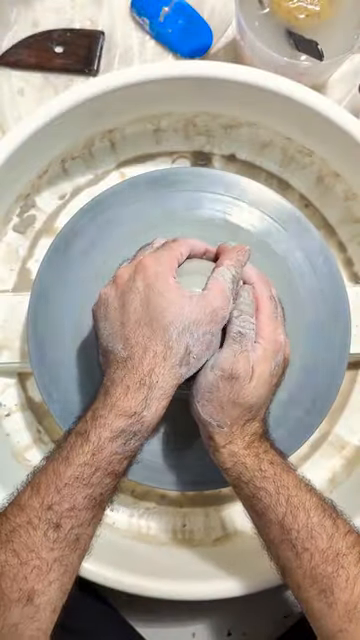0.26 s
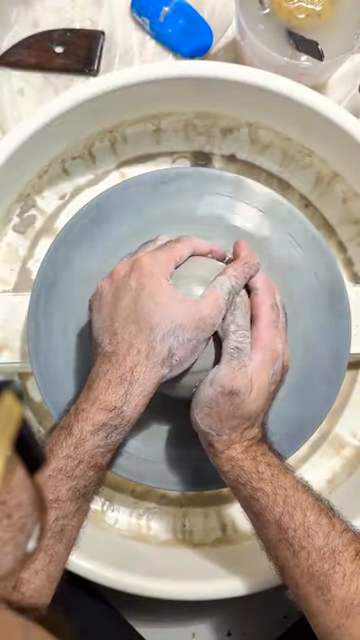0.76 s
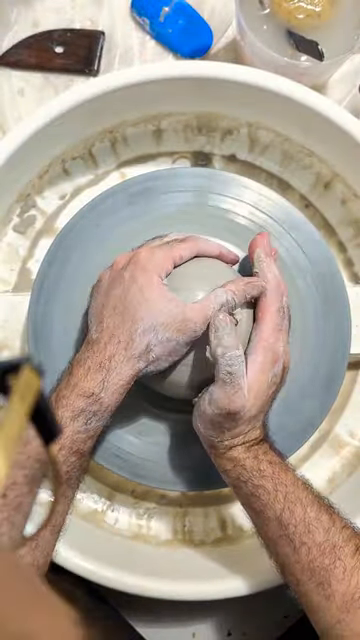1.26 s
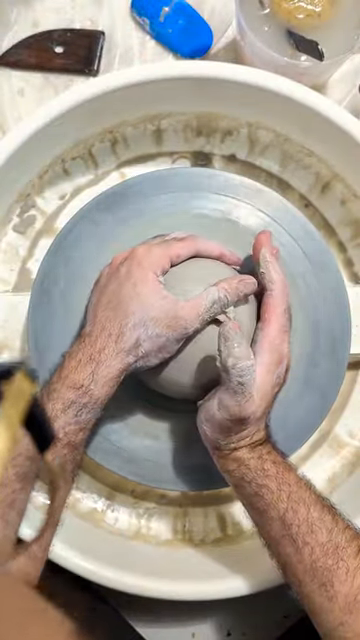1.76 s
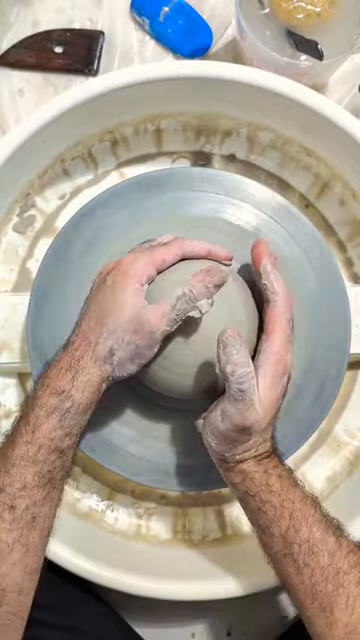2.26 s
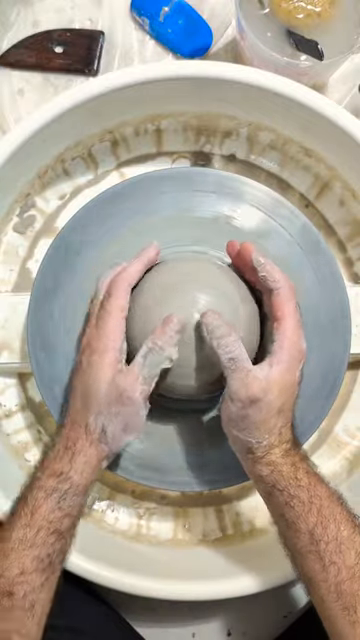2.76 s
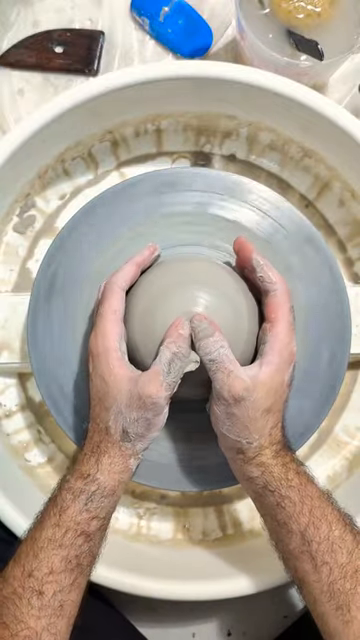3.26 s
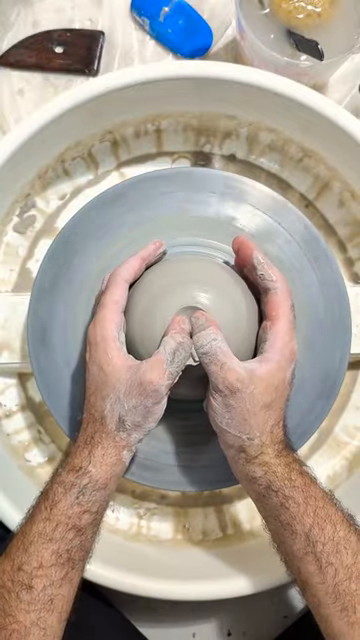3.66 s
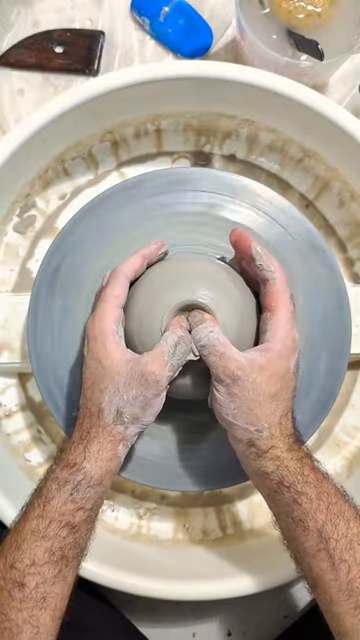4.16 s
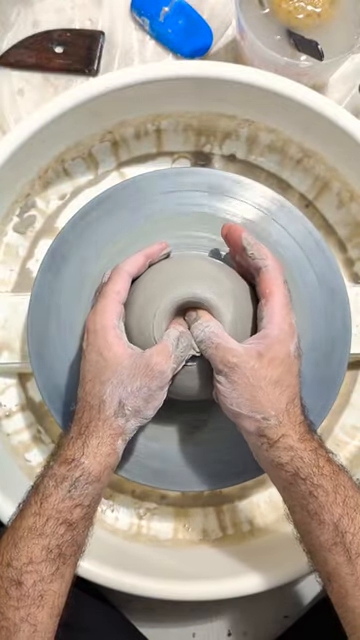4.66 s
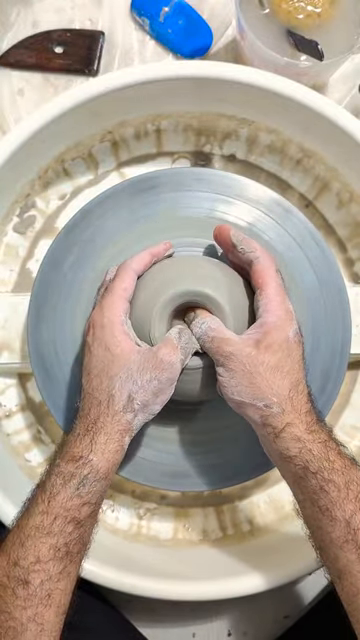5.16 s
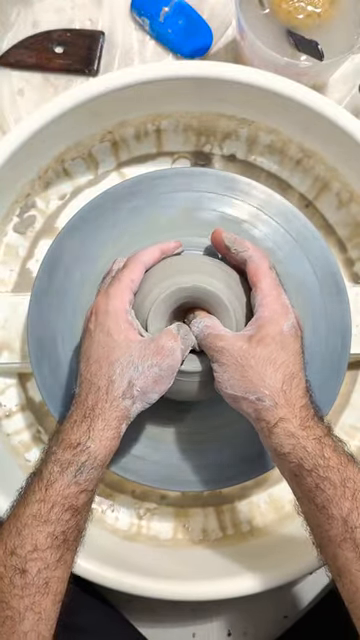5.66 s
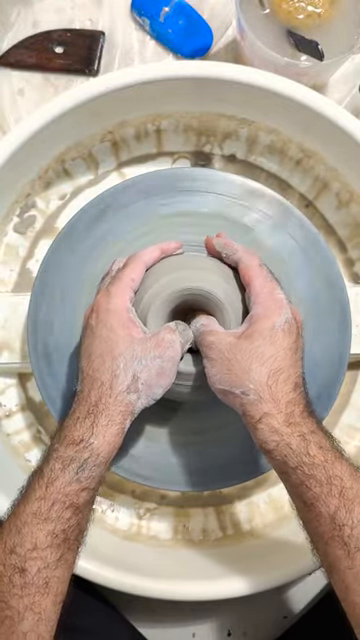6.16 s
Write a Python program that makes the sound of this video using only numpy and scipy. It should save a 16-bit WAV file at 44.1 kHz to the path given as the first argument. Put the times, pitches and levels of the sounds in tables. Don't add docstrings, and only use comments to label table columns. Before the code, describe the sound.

In a small quiet studio, a soft wet smack of clay comes over low rumble, then a pottery wheel's motor quickly spins up to a nearly pure mid-pitched whine. It sags slightly under load while wet palms rub with gritty hiss and a faint metallic ring. Dull belt grinding, fine rattling and small ticks follow, with one tiny high squeak. Close microphone, mono.

```python
import sys
import numpy as np
from scipy import signal
from scipy.fft import rfft, irfft, next_fast_len
from scipy.io import wavfile
from scipy.ndimage import uniform_filter1d

SR = 44100
rng = np.random.default_rng(int(sys.argv[2]) if len(sys.argv) > 2 else 0)


def convert_level_to_amplitude(level_db):
    exponent = np.asarray(level_db, float) / 20
    return 10 ** exponent


def transcribe(u):
    v = np.clip(np.atleast_2d(u).T, -1, 1)
    q = np.round(v * 32767).astype(np.int16)
    wavfile.write(sys.argv[1], SR, q)


N = 283298
T = np.arange(N) / SR


def evened(x):
    return x / np.sqrt(np.mean(x ** 2) + 1e-30)


def columns(rows, t):
    s, *values = np.transpose(rows)
    return [np.interp(t, s, v) for v in values]


def coloured(x, points):
    hz, db = np.transpose(points)
    size = next_fast_len(N)
    f = np.fft.rfftfreq(size, 1 / SR)
    gain = convert_level_to_amplitude(np.interp(np.log(f + 1), np.log(hz + 1), db, -90, -90))
    return evened(irfft(rfft(x, size) * gain, size)[:N])


def resonate(x, hz, width):
    turn = np.exp(2j * np.pi * hz * np.arange(len(x)) / SR)
    r = np.exp(-np.pi * abs(width) / SR)
    return evened((turn * signal.lfilter([1], [1, -2 * r, r * r], x / turn)).real)


def drift(seconds):
    span = max(int(seconds * SR), 2)
    return evened(uniform_filter1d(uniform_filter1d(rng.standard_normal(N), span), span))


def add(mix, s, sound):
    part = mix[round(s * SR):][:len(sound)]
    part += sound[:len(part)]


def stage(levels_db, at):
    half_s = 0.25
    return np.interp(T, [at - half_s, at + half_s], levels_db)


def swell(at, half):
    return np.exp(-((T - at) / half) ** 2)


# [t/s, f/Hz, level/dB]
SPIN_UP = [
    (0.31, 345, -80),
    (0.33, 352, -61),
    (0.355, 360, -58),
    (0.37, 392, -62),
    (0.4, 422, -54),
    (0.44, 429.8, -50.6),
]
# [t/s, f/Hz, level/dB]
RUNNING = [(0.5, 433.1, -48.2), (0.62, 433, -49.5), (0.71, 427.8, -51.5), (1.05, 422.4, -54),
           (1.8, 422, -54.6), (2.09, 429.5, -52.5), (2.16, 431.4, -50), (2.45, 436, -51),
           (2.78, 446, -50.5), (3.02, 437.7, -51), (3.22, 434.3, -48.5), (3.5, 437.4, -48.5),
           (4.07, 436.5, -48.5), (4.61, 428.7, -50.4), (4.72, 433.5, -49.5), (5.43, 427, -52),
           (5.5, 432.6, -50.5), (6.2, 424.5, -53)]
OVERTONE_DB = [-44, -47.5]
# [middle t/s, half length/s, level/dB under the whine]
BUZZES = [
    [(2.65, 0.15, -23.5), (2.97, 0.1, -26), (4.9, .3, -36)],
    [(1.5, .6, -47), (2.27, 0.052, -31.5), (2.65, 0.083, -30.5), (5.1, 0.089, -34.5), (5.7, 0.15, -29)],
]


def motor():
    hz, level_db = columns(SPIN_UP + RUNNING, T)
    hunting_s = 0.05
    hz = hz + 1.21 * drift(0.019) + 0.3 * drift(hunting_s)
    turn = 2 * np.pi * np.cumsum(hz) / SR
    tone = np.sin(turn)
    flutter = convert_level_to_amplitude(2.5 * drift(0.02))
    for harmonic, (rest_db, buzzes) in enumerate(zip(OVERTONE_DB, BUZZES), 2):
        power = convert_level_to_amplitude(2 * rest_db) + sum(convert_level_to_amplitude(2 * db) * swell(s, half) for s, half, db in buzzes)
        tone = tone + np.sqrt(power) * flutter * np.sin(harmonic * turn)
    gear_db = stage((-24, -35), 1.85) + 1.5 * drift(0.032)
    tone = tone + convert_level_to_amplitude(gear_db) * np.sin(1.93 * turn + 0.3 * drift(0.05))
    level_db = level_db + 0.81 * drift(0.0082) + 0.5 * drift(hunting_s)
    return np.sqrt(2) * convert_level_to_amplitude(level_db) * tone * (T > SPIN_UP[0][0])


# [t/s, rub level/dB, wetness as fizz over rub/dB, head contact as ring over rub/dB]
GRIP = [(0, -104, 6, -2), (.3, -91, 0, 6.5), (.5, -83.5, 1.5, 0), (.82, -81, 2.5, -2.5),
        (1.2, -80.5, 4.5, 0), (1.27, -73.5, 3, -3.5), (1.6, -73.5, 6, -2.5), (2.22, -76, 2, -1),
        (2.41, -80, 4, -0.5), (2.66, -75.5, -0.5, -5), (2.86, -95, 1, -7), (3.1, -84, 2.5, -2.5),
        (3.56, -77.5, -0.5, -3.5), (3.85, -88.5, 1, -4), (5.21, -89, -1.5, -3.5), (5.3, -78.5, 2, 0),
        (5.85, -75, -0.5, -2), (6.42, -81.5, 3, 1.5)]
# [middle t/s, half length/s, rub level/dB, fizz over rub/dB]
PUSHES = [(.116, 0.015, -73, -2.5), (0.173, 0.046, -83.5, 0), (0.363, 0.029, -84.5, -1),
          (0.535, .04, -83, -7), (0.638, 0.0094, -73.5, 3), (0.702, 0.027, -79, -1),
          (0.816, 0.047, -76.5, 2), (0.894, 0.028, -72.5, 1), (1.084, 0.038, -78, -6),
          (1.57, 0.045, -79.5, 4), (2.07, 0.04, -80, 5.5), (2.524, 0.051, -75, 2.5),
          (2.627, 0.038, -77.5, 11), (2.795, 0.023, -83, 1), (3.025, 0.027, -82, 2.5),
          (3.16, 0.033, -83, 1), (3.72, 0.074, -87, 2), (4.251, 0.039, -87.5, 1), (4.67, 0.075, -84.5, 0),
          (4.859, 0.049, -88, 2), (5.12, 0.025, -90, 3), (5.43, 0.052, -82.5, 3), (6.095, 0.014, -76, -5),
          (6.135, 0.028, -71.5, 1), (6.193, .018, -72, 3), (6.368, 0.021, -74.5, -1)]


def touch():
    grip_db, wet_db, contact_db = columns(GRIP, T)
    push_ring_db = -3
    pushed = sum(convert_level_to_amplitude(2 * db) * swell(s, half) for s, half, db, _ in PUSHES)
    pushed_fizz = sum(convert_level_to_amplitude(2 * (db + wet)) * swell(s, half) for s, half, db, wet in PUSHES)
    rub = convert_level_to_amplitude(2 * grip_db) + pushed
    fizz = convert_level_to_amplitude(2 * (grip_db + wet_db)) + pushed_fizz
    ring = convert_level_to_amplitude(2 * (grip_db + contact_db)) + convert_level_to_amplitude(2 * push_ring_db) * pushed
    return 10 * np.log10([rub, fizz, ring])


# [f/Hz, level/dB per Hz]
RUB_COLOUR = [(500, -20), (1000, 2.5), (1600, -3.5), (2400, -2.5), (3500, -2), (5500, -0.5), (6500, -8),
              (9000, -23)]
# [f/Hz, level/dB per Hz]
FIZZ_COLOUR = [(4500, -16), (6300, -5.5), (8500, -0.5), (9800, -2.5), (10400, -6), (12500, -10),
               (15500, -14.5)]
# [f/Hz, width/Hz, level/dB]
HEAD_MODES = [(3930, 65, -4.5), (3969, 68, -3.5), (2843, 170, -7), (3160, 76, -10.5), (4835, 190, -7.5),
              (5520, 220, -19)]


def hands():
    rub_db, fizz_db, ring_db = touch()
    drag_db = 0.9 * drift(0.011) + 0.54 * drift(0.0041)
    grit = rng.standard_normal((2, N)) * convert_level_to_amplitude(1.5 * rng.exponential(1, (2, N)))
    rub = convert_level_to_amplitude(rub_db + 1.5 + drag_db) * coloured(grit[0], RUB_COLOUR)
    fizz = convert_level_to_amplitude(fizz_db - 1.97 + drag_db + 0.63 * drift(0.013)) * coloured(grit[1], FIZZ_COLOUR)
    ring = np.zeros(N)
    for hz, width, db in HEAD_MODES:
        bursts = convert_level_to_amplitude(2.4 * drag_db + 1.5 * drift(0.0061))
        ring += convert_level_to_amplitude(db) * resonate(rng.standard_normal(N) * bursts, hz, width)
    return rub + fizz + convert_level_to_amplitude(ring_db + 1.0) * ring


# [f/Hz, width/Hz, level/dB]
LOOSE_PARTS = [(5460, 100, -4.5), (6800, 240, -3.5), (8400, 150, -3.5), (8680, 190, -5), (8940, 160, -2.5),
               (9550, 120, -2)]


def chatter():
    shaft_hz, knock_at = 18.8, 0.55
    turns = T * shaft_hz - knock_at + 0.081 * drift(0.059)
    from_knock = (turns + 0.5) % 1 - 0.5
    knock = (0.32 + np.exp(-from_knock ** 2 / 0.04)) * convert_level_to_amplitude(2.5 * drift(0.027))
    parts = np.zeros(N)
    for hz, width, db in LOOSE_PARTS:
        shaken = rng.standard_normal(N) * knock * convert_level_to_amplitude(2.2 * drift(0.018))
        parts += convert_level_to_amplitude(db) * resonate(shaken, hz, width)
    over_fizz_db = stage((-10.5, -2.5), 4.05)
    return convert_level_to_amplitude(touch()[1] + over_fizz_db - 5.5) * parts


# [t/s, grind level/dB]
STRAIN = [
    (0, -77),
    (.6, -62.5),
    (2.12, -70.5),
    (2.18, -80),
    (2.41, -81),
    (2.47, -67.5),
    (4.5, -73.5),
    (4.83, -67.5),
    (6.42, -68.5),
]
# [f/Hz, level/dB per Hz]
GRIND_COLOUR = [(450, -19), (600, -3), (900, 7), (1150, -3.5), (1600, -12.5), (2200, -18)]


def grind():
    level_db = columns(STRAIN, T)[0] - 7.0 + 1.1 * drift(0.021)
    return convert_level_to_amplitude(level_db) * coloured(rng.standard_normal(N), GRIND_COLOUR)


# [t/s, peak
# level/dB, f/Hz, width/Hz, length/s]
TICKS = [(.098, -61.5, 7000, 4000, .02), (.116, -60, 2100, 2500, .004), (.114, -66, 2400, 500, .008),
         (.116, -65, 3950, 200, .008), (.117, -57, 840, 260, .0085), (.118, -63, 1370, 150, .0084),
         (.158, -67, 6700, 4000, .027), (.54, -65, 4200, 3900, .0036), (.56, -64, 1200, 500, .03),
         (.63, -59, 3500, 4000, .002), (.63, -51.5, 5500, 800, .005), (.631, -57, 1150, 500, .008),
         (.879, -70, 3200, 250, .04), (2.78, -68, 2870, 260, .01), (2.783, -68.5, 4000, 190, .012),
         (5.39, -69, 5500, 300, .01), (5.815, -69, 5500, 300, .01), (5.92, -68, 5500, 330, .01),
         (6.088, -64, 3950, 150, .012), (6.09, -63, 9180, 1500, .0084), (6.132, -61, 3940, 120, .022),
         (6.128, -63, 8520, 1500, .028), (6.13, -66, 2870, 220, .025), (6.194, -58, 9600, 700, .011)]


def ticks():
    out = np.zeros(N)
    t = np.arange(4000) / SR
    for s, db, hz, width, length in TICKS:
        puff = resonate(rng.standard_normal(len(t)) * np.exp(-(t / length) ** 2), hz, width)
        add(out, s, convert_level_to_amplitude(db) * puff / abs(puff).max())
    return out


# [start t/s, length/s, from f/Hz, to f/Hz, level/dB]
SQUEAKS = [
    (4.1, .085, 9750, 10850, -96),
    (4.16, .075, 8400, 8250, -98),
    (4.18, .042, 10780, 10730, -94),
    (4.218, .04, 10750, 11850, -98),
    (4.228, .038, 10550, 10900, -96),
    (4.256, .047, 11700, 11520, -99),
    (4.265, .045, 10620, 10550, -97),
    (4.305, .065, 10600, 10200, -101),
    (4.31, .075, 12000, 10950, -98),
    (4.31, .09, 8400, 8600, -99),
]


def squeak():
    out = np.zeros(N)
    for s, length, from_hz, to_hz, db in SQUEAKS:
        u = np.arange(0, length, 1 / SR) / length
        hz = from_hz + (to_hz - from_hz) * np.sin(np.pi / 2 * u)
        chance = uniform_filter1d(rng.standard_normal((2, 6000)), size=300) * np.sqrt(300)
        waver, flicker = chance[:, :len(u)]
        tone = np.sin(2 * np.pi * np.cumsum(hz + 30 * waver) / SR) * signal.windows.tukey(len(u), 0.2)
        add(out, s, np.sqrt(2) * convert_level_to_amplitude(db + 1.0 + 2.1 * flicker) * tone)
    return out


# [f/Hz, level/dB per Hz]
ROOM_COLOUR = [(8, -6), (15, -1), (25, -2), (40, -1), (60, -9), (118, -16.5), (177, -15), (243, -22.5),
               (400, -19.5), (533, -23), (848, -30.5), (2090, -45.5), (9430, -60), (15400, -65.5)]
# [f/Hz, width/Hz, level/dB, from t/s, to t/s]
HUMS = [(77, 22, -68, -3, 7), (152.2, 30, -72, 0.8, 7), (200.8, 28, -72.5, -5, 7),
        (309.2, 19, -77, -0.9, 7), (434, 120, -70, -1, 0.44), (802.6, 40, -79.5, 0.3, 7),
        (1464, 37, -90, 1.2, 7), (661, 81, -77, -0.4, 2.3), (912, 57, -78.5, 1.2, 2.1),
        (1040, 28, -78.5, -1, .34)]


def studio():
    air = convert_level_to_amplitude(-56.5 + 0.76 * drift(0.08)) * coloured(rng.standard_normal(N), ROOM_COLOUR)
    for hz, width, db, start, end in HUMS:
        inside_s = np.minimum(T - start, end - T)
        sounding = np.clip(inside_s / 0.013 + 0.5, 0, 1)
        air = air + convert_level_to_amplitude(db) * sounding * resonate(rng.standard_normal(N), hz, width)
    return air


def splices():
    splices_per_s = 25.42
    middle, share = 0.29, 0.27
    from_middle = (T * splices_per_s - middle + 0.5) % 1 - 0.5
    u = np.clip(from_middle / share + 0.5, 0, 1)
    return np.sqrt(u ** 2 + (1 - u) ** 2)


def scene():
    noises = hands() + chatter() + grind() + studio()
    return (motor() + ticks() + squeak() + splices() * noises)[None]


# [f/Hz, level/dB a bin must stand over its neighbourhood]
GATE = [(10500, -11), (11500, -4), (12500, -1.5), (14000, -1.5), (15500, 1.5)]


def treble_holes(x):
    hz, _, z = signal.stft(x, SR, nperseg=1536)
    power = uniform_filter1d(uniform_filter1d(abs(z) ** 2, size=2, axis=1), size=3, axis=0)
    around = uniform_filter1d(uniform_filter1d(power, size=32, axis=0), size=3, axis=1)
    needed_db = columns(GATE, hz)[0] - 100 * (hz < GATE[0][0])
    kept = power > around * convert_level_to_amplitude(2 * needed_db)[:, None]
    return signal.istft(z * np.where(kept, 1, convert_level_to_amplitude(-22.0)), SR, nperseg=1536)[1][:N]


def top_cut(x):
    return signal.sosfilt(signal.butter(12, 15600, fs=SR, output="sos"), x)


def record(dry):
    mix = treble_holes(dry[0])[None]
    return top_cut(mix)


dry = scene()
out = record(dry)
transcribe(out)
```